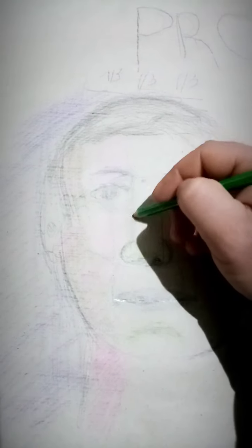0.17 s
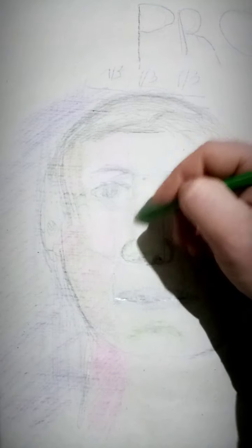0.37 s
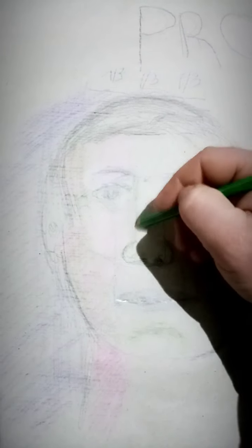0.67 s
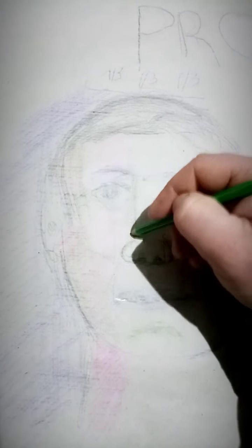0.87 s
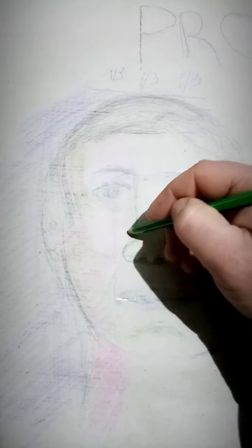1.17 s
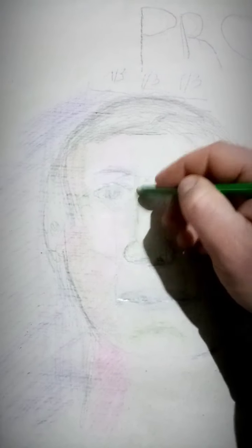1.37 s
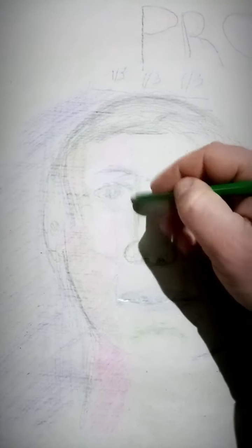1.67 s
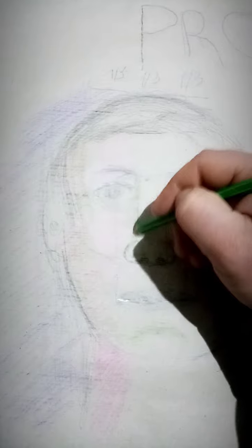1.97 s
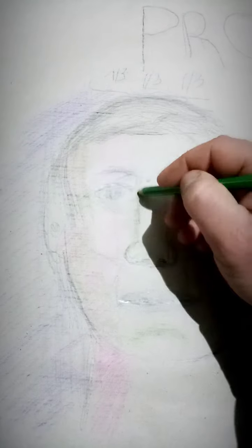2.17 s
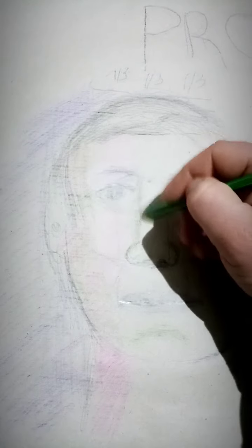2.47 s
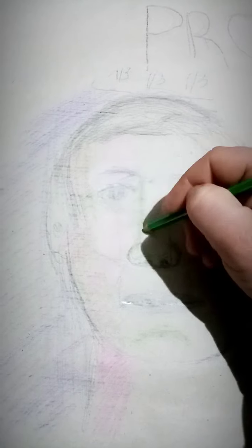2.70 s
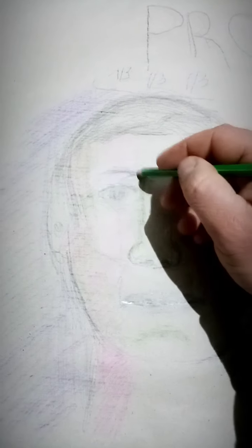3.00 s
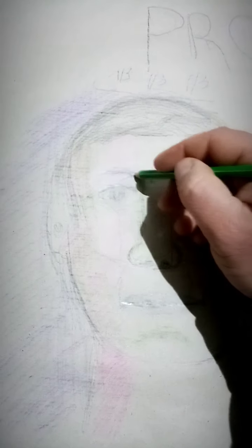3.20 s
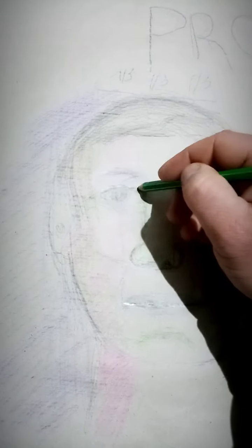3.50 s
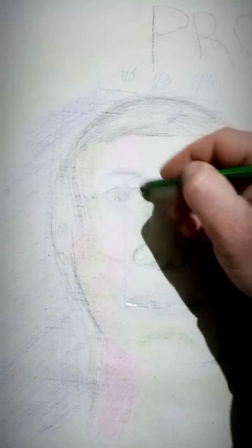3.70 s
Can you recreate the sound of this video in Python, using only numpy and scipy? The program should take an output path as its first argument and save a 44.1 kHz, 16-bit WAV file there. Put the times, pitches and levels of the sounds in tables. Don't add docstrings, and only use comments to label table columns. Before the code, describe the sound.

Close up, pencil strokes scrape paper about eight times a second, pausing briefly twice, then return with crisp tip ticks before turning light and sparse. The board underneath hums low; faint room noise, slightly louder on the right.

```python
import sys
import numpy as np
from scipy import signal
from scipy.fft import rfft, irfft, next_fast_len
from scipy.io import wavfile
from scipy.ndimage import uniform_filter1d, map_coordinates

SR = 44100
rng = np.random.default_rng(int(sys.argv[2]) if len(sys.argv) > 2 else 0)


def rack_gain(trim_db):
    fader = np.asarray(trim_db, float)
    return 10 ** (fader / 20)


def wrap_up_sound(samples):
    columns = np.atleast_2d(samples).T
    tamed = np.clip(columns, -1, 1)
    steps = np.round(tamed * 32767).astype(np.int16)
    wavfile.write(sys.argv[1], SR, steps)


N = 169785

# t/s, tick level/dB, rasp level/dB, push on the board/dB
TIP_CATCHES = [(.032, -70, -64.5, -60), (.158, -58, -52.5, -71), (0.236, -60, -62, -61),
               (0.4577, -53, -63, -65), (1.0899, -44.5, -74, -77), (1.3863, -39, -53.5, -61),
               (1.735, -61, -50.5, -47), (1.95, -56, -68, -72), (2.038, -59, -73, -65),
               (2.385, -61, -43.5, -58), (2.4208, -46, -47, -64), (2.429, -43, -61, -76),
               (2.5147, -42, -63, -42), (2.523, -46.5, -49, -60), (2.748, -71, -67, -63),
               (2.8152, -41, -70, -65), (2.836, -43, -52.5, -49), (3.05, -68, -72, -68),
               (3.064, -59, -81, -71), (3.17, -57, -66, -59), (3.3799, -60.5, -67.5, -81),
               (3.62, -55, -66, -84), (3.6713, -50.5, -69, -78), (3.80, -70, -69, -72)]


def unit(x):
    return x / np.sqrt(np.mean(x ** 2) + 1e-20)


def along(points, hz):
    f, value = np.transpose(points)
    return np.interp(np.log(hz + 1), np.log(f + 1), value)


def filtered(x, response):
    m = next_fast_len(N + SR // 2)
    f = np.fft.rfftfreq(m, 1 / SR)
    return irfft(rfft(x, m) * response(f), m)[..., :N]


def wobble(rate):
    knots = rng.standard_normal(int(N * rate / SR) + 4)
    return map_coordinates(knots, [np.arange(N) * rate / SR])


def body(modes):
    def response(f):
        total = 0
        for k, (centre, width, db) in enumerate(modes):
            ring = 1j * f * width / (centre ** 2 - f ** 2 + 1j * f * width)
            total = total + (-1) ** k * rack_gain(db) * ring
        return total
    return response


def played(force, grit, response):
    return filtered(force * grit, response) / filtered(grit, response).std()


def room():
    # f/Hz, level per Hz/dB
    noise_colour = [(15, -8), (25, 18), (133, 0.5), (749, -10), (1550, -13), (1980, -13), (2460, -12),
                    (2730, -13.5), (15800, -26.5)]
    noise = filtered(rng.standard_normal((2, N)), lambda f: rack_gain(along(noise_colour, f)))
    return rack_gain(-66.5 + wobble(3.13)) * unit(noise)


def walls(force):
    t60_s, tail_db = 0.2, -9
    keep = rack_gain(-120 / (t60_s * SR))
    tail = signal.lfilter([1 - keep], [1, -keep], force ** 2)
    return np.sqrt(force ** 2 + rack_gain(2 * tail_db) * tail)


def hum(force, push):
    # t/s, level/dB, f/Hz, length/s
    board_jolts = [(0.113, -43, 113.3, 0.029), (0.148, -53, 99, 0.011), (0.185, -53, 88.5, 0.011),
                   (0.244, -41.5, 105.5, 0.01), (0.291, -49, 108, 0.021), (0.379, -43, 117.3, 0.053),
                   (0.446, -52, 95.3, 0.026), (0.489, -47.5, 118.4, 0.01), (0.512, -50, 98.9, 0.013),
                   (0.642, -41.5, 106.9, 0.026), (0.684, -42.5, 86.6, 0.042), (0.742, -44, 112, 0.01),
                   (0.817, -49.5, 114, 0.0076), (0.858, -38.0, 117.1, 0.0094), (0.9, -46.5, 96.6, 0.015),
                   (0.974, -49, 112, 0.034), (1.03, -43.5, 88, 0.011), (1.066, -39.5, 107.4, 0.019),
                   (1.113, -50, 119, 0.0044), (1.175, -54, 116.2, 0.011), (1.203, -51.4, 90.1, 0.013),
                   (1.369, -45.5, 115.7, 0.031), (1.528, -43, 100.5, 0.015), (1.566, -50.5, 94.5, 0.019),
                   (1.656, -52, 133, 0.023), (1.755, -37.5, 116.6, 0.037), (1.892, -41.5, 114.3, 0.051),
                   (1.937, -42.5, 111.8, 0.015), (1.971, -43, 111.3, 0.018), (2, -66, 123.9, 0.017),
                   (2.041, -51, 97, 0.026), (2.099, -44.5, 108.1, 0.044), (2.148, -46.5, 102.1, 0.041),
                   (2.393, -38.5, 120, 0.033), (2.528, -39, 125.7, 0.014), (2.57, -42.5, 101.9, 0.03),
                   (2.617, -54, 133.8, 0.016), (2.654, -42.5, 129, 0.011), (2.68, -47, 112.2, 0.015),
                   (2.737, -51, 99.5, 0.021), (2.784, -53, 105, 0.018), (2.856, -52, 93.35, 0.017),
                   (3.069, -50, 116.4, 0.0072), (3.224, -52, 109, 0.024), (3.443, -51, 102, 0.017),
                   (3.493, -51, 101, 0.012), (3.709, -48, 94.7, 0.026), (3.838, -49, 106, 0.012)]
    # f/Hz, width/Hz, level/dB
    board_modes = [(66, 14, -19), (90.7, 13, -5), (113.2, 15.2, -8), (140, 22, -9), (186, 30, -11),
                   (236, 30, -17)]
    shortest_s, length_share = 0.0096, 0.39
    jolt_db, rattle_db = -4, 19

    t = np.arange(N) / SR
    energy = np.zeros(N)
    for start, db, _, length in board_jolts:
        width = np.hypot(shortest_s, length_share * length)
        energy += rack_gain(2 * db) * np.exp(-((t - start) / width) ** 2)
    start, _, hz, _ = np.transpose(board_jolts)
    pitch = np.interp(t, start, hz)
    jolts = rack_gain(jolt_db) * np.sqrt(energy) * np.sin(2 * np.pi * np.cumsum(pitch) / SR)

    ring = body(board_modes)
    shake = force * rng.standard_normal((2, N)) + push
    rattle = filtered(shake, lambda f: ring(f) / (1 + (f / 320) ** 4))
    return jolts + rack_gain(rattle_db) * rattle


def rings():
    # t/s, level/dB, f/Hz
    sheet_knocks = [(0.132, -42.5, 638), (0.155, -45, 993), (0.367, -62, 659), (0.468, -51, 760),
                    (0.481, -44.5, 628), (0.617, -38, 542), (0.838, -49, 778), (0.855, -43, 573),
                    (1.362, -40, 627), (1.505, -47, 572), (1.628, -52, 554), (1.649, -44.5, 783),
                    (1.734, -49, 647), (1.753, -37, 612), (1.875, -49, 538.5), (1.95, -46, 658),
                    (2.067, -48, 695), (2.384, -47, 809), (2.42, -50, 633), (2.52, -48, 868),
                    (2.657, -45, 810), (2.768, -47, 541), (2.834, -51, 605), (3.673, -50, 635)]
    # t/s, level/dB, f/Hz, t60/s (time to die by 60 dB)
    shaft_pings = [
        (2.8152, -49, 6480, .014),
        (2.816, -55, 9000, 0.0087),
        (2.8154, -54, 12550, .012),
        (2.8152, -50, 15200, .015),
        (3.6715, -57.5, 1480, 0.038),
        (3.6712, -55, 1908, 0.026),
        (3.672, -54.5, 4220, 0.042),
    ]
    rows = [(s, db - 6, hz, 0.032, 0.001) for s, db, hz in sheet_knocks]
    rows += [(*ping, 0.0002) for ping in shaft_pings]

    t = np.arange(N) / SR
    tones = np.zeros(N)
    for s, db, hz, t60, rise in rows:
        since = np.clip(t - s, 0, None)
        fade = rack_gain(db - 60 * since / t60) * (1 - np.exp(-since / rise))
        tones += fade * np.sin(2 * np.pi * hz * since)
    return tones * [[1], [.4]]


def catches():
    t = np.arange(N) / SR
    tick, knock, push = np.zeros((3, N))

    def dying(s, db, t60):
        return (t >= s) * rack_gain(db - 60 * np.abs(t - s) / t60)

    for s, tick_db, rasp_db, push_db in TIP_CATCHES:
        tick += dying(s, tick_db, 0.022)
        knock += dying(s, rasp_db, 0.033)
        push[round(s * SR)] = rack_gain(push_db + 32.5)
    return tick, knock, push


def hand():
    # turn t/s, scrape level/dB, hardest press t/s, rasp level/dB, board level/dB
    early_strokes = [(-0.06, -63.5, 0.032, -69, -77), (0.053, -51.5, 0.14, -58, -48),
                     (0.19, -52, 0.251, -63, -55), (0.306, -50, 0.373, -57.5, -45),
                     (0.442, -50.5, 0.497, -58, -48), (0.55, -49, 0.626, -57, -43),
                     (0.692, -50.5, 0.745, -61, -48.5), (0.786, -49, 0.862, -57, -48),
                     (0.921, -53.5, 0.97, -63, -52.5), (1.017, -50.5, 1.092, -59.5, -47),
                     (1.14, -56.5, 1.196, -72, -60), (1.227, -66, 1.234, -95, -71),
                     (1.3, -53, 1.368, -61.5, -50.5), (1.456, -52.5, 1.527, -60, -45),
                     (1.59, -51.5, 1.651, -58.5, -54), (1.707, -51.5, 1.759, -59, -48),
                     (1.812, -51, 1.875, -61.5, -51.5), (1.911, -53.5, 1.958, -60.5, -47.5),
                     (2.022, -53.5, 2.087, -61, -51.5), (2.161, -62, 2.211, -81, -61)]
    late_strokes = [(2.298, -53, 2.41, -64, -46), (2.469, -52.5, 2.525, -60.5, -49),
                    (2.591, -50, 2.666, -52.5, -46), (2.735, -53.5, 2.775, -63.5, -59),
                    (2.808, -51.5, 2.848, -56.5, -54.5), (2.921, -66, 2.958, -77, -67),
                    (3.026, -59.5, 3.08, -74.5, -57), (3.148, -56, 3.25, -73, -57.5),
                    (3.264, -58, 3.306, -73.5, -58), (3.372, -59, 3.431, -74, -60.5),
                    (3.477, -68.5, 3.53, -76, -61), (3.568, -61, 3.63, -73.5, -59.5),
                    (3.663, -59.5, 3.68, -67.5, -59.5), (3.768, -58.5, 3.812, -68.5, -63)]
    end_s, light_from_s = 3.89, 3.0
    lean, light_lean = 0.88, 0.81
    press_pull = 0.23
    speed_power = 1.715
    turn_db = -23
    press_s, shoulder_db = 0.014, -7.5
    shake_s, shake_lag_s, shake_rest_db = 0.03, 0.0054, 7

    t = np.arange(N) / SR
    turn, scrape_db, press, rasp_db, board_db = np.transpose(list(early_strokes) + list(late_strokes))
    edges = np.append(turn, end_s)
    k = np.clip(np.searchsorted(edges, t) - 1, 0, len(turn) - 1)

    press_place = np.clip((press - turn) / np.diff(edges), 1 / 3, 3 / 4)
    pull = (np.log(.5) / np.log(press_place)) ** press_pull
    progress = np.clip((t - edges[k]) / (edges[k + 1] - edges[k]), 0, 1)
    skew = np.where(t < light_from_s, lean * pull[k], light_lean)
    speed = np.abs(np.sin(np.pi * progress ** skew)) ** speed_power
    glide = rack_gain(turn_db + np.interp(t, (edges[1:] + edges[:-1]) / 2, scrape_db))

    def bump(lag, width):
        return np.exp(-.5 * ((t - press[k] - lag) / width) ** 2)

    scrape = np.hypot(rack_gain(scrape_db[k]) * speed, glide)
    rasp = rack_gain(rasp_db[k]) * np.hypot(bump(0, press_s), rack_gain(shoulder_db) * speed)
    board = rack_gain(board_db[k]) * np.hypot(bump(shake_lag_s, shake_s), rack_gain(shake_rest_db) * speed)
    return scrape, rasp, board


def patchy(pair):
    z = signal.stft(pair, nperseg=512)[2]
    field = uniform_filter1d(rng.standard_normal(z.shape[1:]), size=7, axis=0)
    field = uniform_filter1d(field, size=8, axis=1)
    painted = z * rack_gain(2.5 * unit(field))
    return unit(signal.istft(painted, nperseg=512)[1][:, :N])


def fibres():
    snaps_per_s, scatter_db, clump_db = 12000, 3, 0.78
    hit = rng.random((2, N)) < snaps_per_s / SR
    size = rack_gain(scatter_db * rng.standard_normal((2, N))) * rng.standard_normal((2, N))
    clumps = rack_gain(clump_db * (wobble(160) + 0.29 * wobble(35.26)))
    return patchy(hit * size * clumps)


def hiss(force):
    # f/Hz, level per Hz/dB
    scrape_colour = [(650, -16.5), (1100, -27.5), (2200, -20), (3070, -7.5), (5920, 0.5), (9360, -7),
                     (11800, -17), (14800, -11), (15800, -37.5)]
    # f/Hz, width/Hz, boost/dB
    sheen_peaks = [(1404, 63, 7.5), (1958, 69, 10), (2980, 280, 6), (4870, 1300, 1), (5830, 210, 2.5),
                   (6470, 83, 8), (7430, 99, 5), (9220, 280, 6.5), (9900, 500, 4.5), (14100, 340, -12.5),
                   (15180, 810, 17)]

    def sheen(f):
        db = along([(500, -15)] + list(scrape_colour), f)
        for centre, width, boost in sheen_peaks:
            db = db + boost / (1 + (2 * (f - centre) / width) ** 2)
        return rack_gain(db)

    grit = fibres()
    grit[:, [round(row[0] * SR) + 1 for row in TIP_CATCHES]] = rack_gain(12)
    return played(walls(force), grit, sheen)


def paper_rasp(force):
    # f/Hz, width/Hz, level/dB
    paper_modes = [(273, 63, 2), (341, 73, 1.5), (583.6, 77, 1), (827, 78, -3.5), (975, 125, -8),
                   (1510, 285, -10), (1970, 265, -11.5), (2970, 570, -13)]
    return played(walls(force), fibres(), body(paper_modes))


def pencil():
    scrape, rasp, board = hand()
    tick, knock, push = catches()
    return hiss(np.hypot(scrape, tick)) + paper_rasp(np.hypot(rasp, knock)) + hum(board, push)


def ports(pair):
    # f/Hz, likeness from 0 to 1
    likeness = [(100, .995), (350, .8), (800, .68), (1500, .38), (3500, .25), (5000, .5), (9000, .52),
                (11000, .1)]
    # f/Hz, level/dB
    left_over_right = [(60, -5), (330, -9), (700, -5.5), (1300, -4), (2900, -5), (5500, -3.5), (7000, -2),
                       (9200, -3)]
    # f/Hz, level/dB
    left_treble = [(9800, 1.5), (11500, -4.5), (13500, -15), (15000, -32)]
    right_lag_s, bass_lag_share, bass_hz = 0.001161, 0.84, 248

    def left_gain(f):
        return rack_gain(along(left_over_right, f) / 2 + along(left_treble, f))

    def right_mix(f):
        alike = np.clip(along(likeness, f), 0, 1)
        lag = right_lag_s * (1 - (1 - bass_lag_share) / (1 + (f / bass_hz) ** 2))
        late = rack_gain(-along(left_over_right, f) / 2) * np.exp(-2j * np.pi * f * lag)
        return late * [alike, np.sqrt(1 - alike ** 2)]

    return np.array([filtered(pair[0], left_gain), filtered(pair, right_mix).sum(0)])


def scene():
    return ports(rack_gain(3) * (pencil() + rings()) + room())


def band_limit(x):
    return signal.sosfilt(signal.butter(12, 16300, fs=SR, output="sos"), x)


def record(dry):
    low_cut_hz, top_hz = 75, 15810

    def band(f):
        x = f / low_cut_hz
        return (f < top_hz) * (1j * x) ** 2 / (1 + 1.4j * x - x ** 2)

    return band_limit(filtered(dry, band))


dry = scene()
out = record(dry)
wrap_up_sound(out)
```